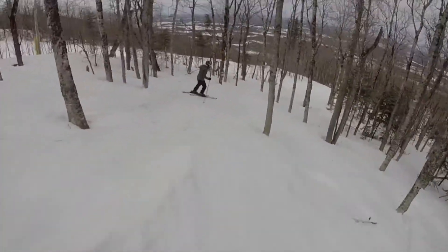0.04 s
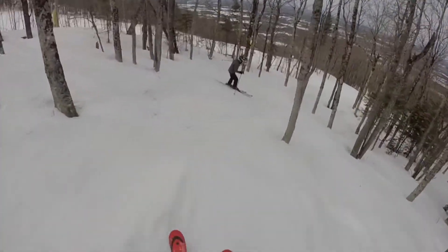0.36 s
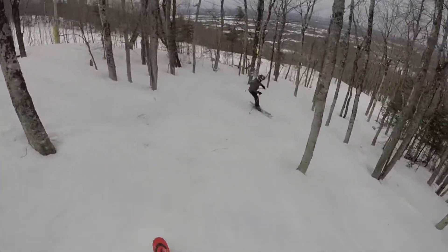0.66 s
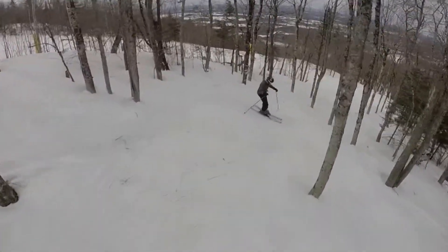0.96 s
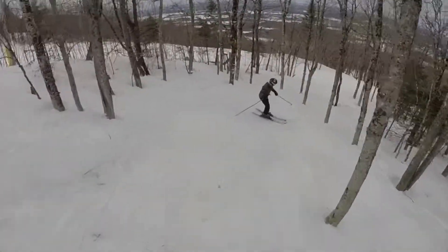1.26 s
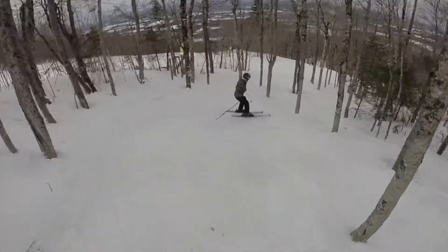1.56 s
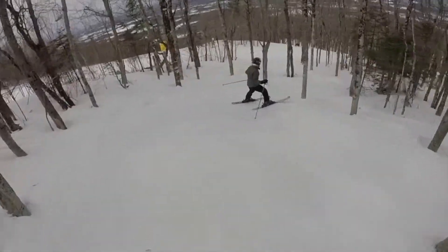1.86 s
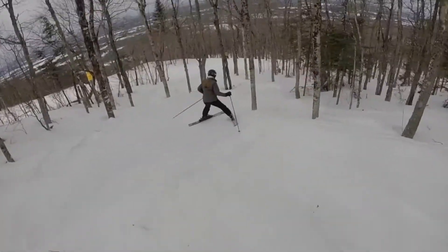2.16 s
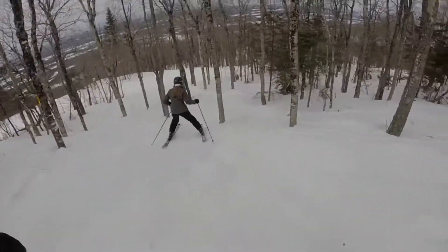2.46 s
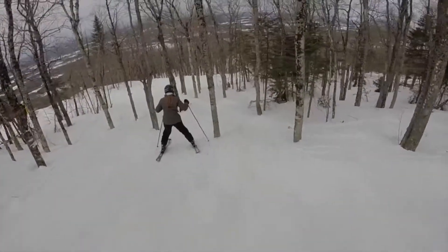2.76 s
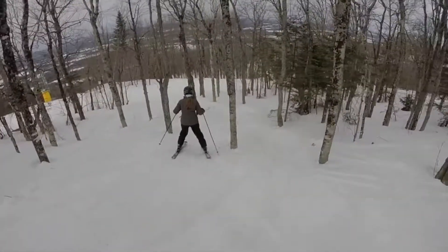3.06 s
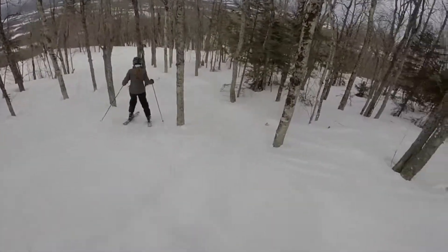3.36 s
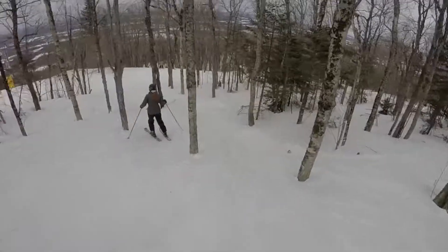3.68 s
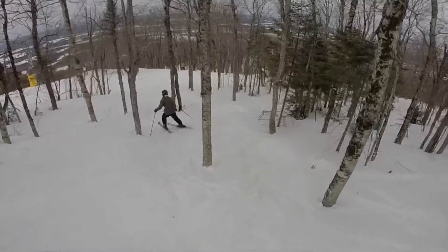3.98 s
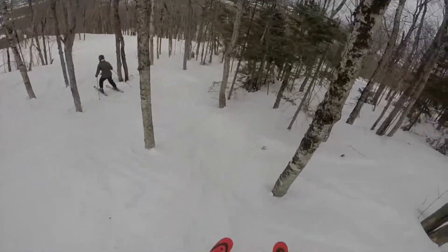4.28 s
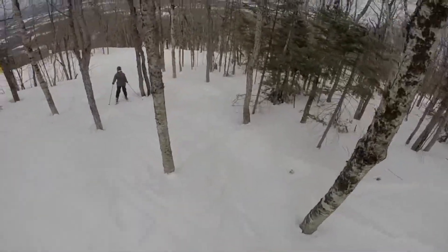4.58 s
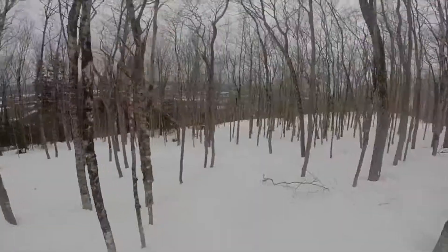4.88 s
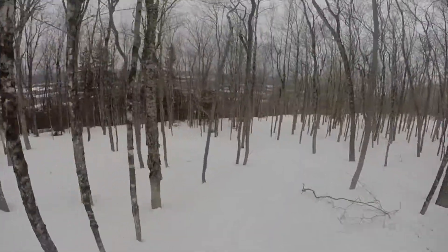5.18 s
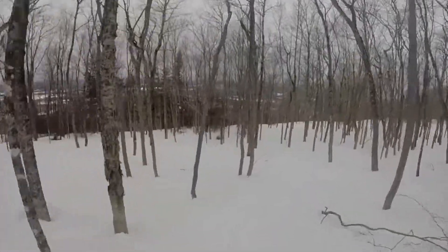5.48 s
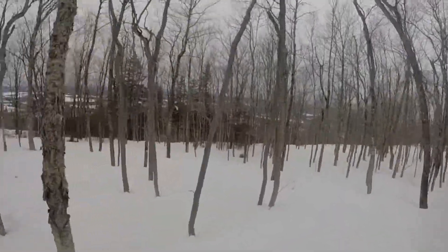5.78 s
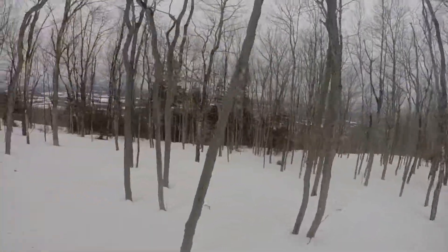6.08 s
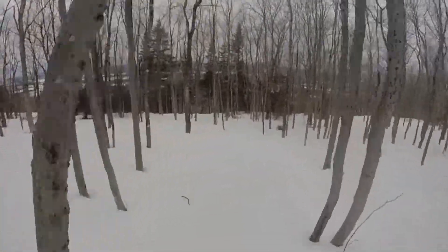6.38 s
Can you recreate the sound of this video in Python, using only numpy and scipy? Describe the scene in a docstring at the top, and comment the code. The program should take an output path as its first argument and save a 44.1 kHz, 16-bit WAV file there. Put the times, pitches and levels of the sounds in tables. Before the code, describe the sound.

Ski edges skid and spray through snow before a rattling glide on crust, while gusts of wind buffet and thump the microphone.

```python
"""Ski edges skid through soft snow in a few turns, crunching and spraying, as one skier follows another
through a wood. Then the skis run flatter over a crust that makes them ring, with one hard scrape.
Both textures are countless snapping crystals and tinking granules, louder as the edges press harder.
Clods crunch under the skis, the gear clacks twice, and air rumbles and thumps on a helmet camera."""
import sys
import numpy as np
from scipy import signal
from scipy.fft import rfft, irfft, next_fast_len
from scipy.io import wavfile
from scipy.ndimage import uniform_filter1d

SR = 44100
rng = np.random.default_rng(int(sys.argv[2]) if len(sys.argv) > 2 else 0)


def store_pcm(level_fs):
    """Save levels as 16-bit WAV."""
    pcm = np.round(np.clip(level_fs, -1, 1) * 32767).astype(np.int16)
    wavfile.write(sys.argv[1], SR, np.atleast_2d(pcm).T)


N = 284004
TIME = np.arange(N) / SR
CRUST_FROM_S = 4.85
CUTOFF_HZ = 15250

# air on the housing, rising with the speed of each turn: (time [s], buffet level [dB], throb level [dB])
WIND_LEVELS = [(0, -30.5, -25), (.85, -35, -30), (1.1, -44.5, -44), (1.6, -38, -39.5), (2.0, -42, -28),
               (2.33, -20, -23.5), (2.5, -31.5, -33), (3.2, -39.5, -43), (4.0, -39.5, -44),
               (4.4, -38.5, -32.5), (4.75, -45.5, -47.5), (4.97, -32.5, -41), (5.25, -36.5, -49),
               (5.62, -21.5, -28), (5.8, -31.5, -41), (6.12, -33, -39.5), (6.3, -27, -24.5),
               (6.44, -27.5, -34)]
# gusts that push up the throb: (time [s], boost [dB], length [s])
THROB_GUSTS = [(.4, 5.5, 0.034), (.72, 10.5, 0.026), (.81, 4, 0.045), (1.01, 10, 0.033), (1.28, 8, 0.19),
               (1.74, 11.5, 0.16), (2.13, 11.5, 0.054), (2.63, 13, 0.077), (3.77, 11.5, 0.096),
               (3.93, 10, 0.075), (4.18, 6.5, 0.088), (4.55, 8.5, 0.053), (5.96, 12, 0.054)]
# EQ of the deep buffets, the throb and the rush of air: (frequency [Hz], gain [dB])
BUFFET_EQ = [(8, -23.5), (18, -2), (34, 1), (44, 0), (60, -23), (120, -23.5), (300, -44), (1500, -69.5)]
THROB_EQ = [(20, -35), (40, -12), (50, 1), (61, 7), (74, -3), (95, -18), (125, -22), (160, -54.5),
            (300, -52.5), (600, -46), (1500, -73)]
RUSH_EQ = [(40, -5), (130, -5), (250, -3), (500, -4), (900, -6), (2000, -12), (6000, -23), (15000, -39)]
# jolts and buffets on the housing: (time [s], relative level [dB], pitch [Hz])
THUMP_CUES = [(2.227, -25, 140), (2.292, -18, 127), (2.469, -26.5, 133), (2.614, -22.5, 124),
              (2.666, -26, 106), (4.348, -24.5, 78.4), (5.675, -25.5, 124), (6.18, -1.5, 47),
              (6.267, -25.5, 122), (6.331, -14.5, 44.3)]
# sharp clacks of the gear: (time [s], relative level [dB])
CLACK_CUES = [(2.315, -7), (5.883, -23)]
# what the gear rings with: (frequency [Hz], gain [dB], 60 dB decay time [s])
GEAR_MODES = [(554, 2, 0.0023), (1350, -19, .012), (1970, -7, 0.017), (2440, -4, 0.01),
              (3130, -0.5, 0.0031), (4800, -7.5, 0.012), (6600, -11.5, 0.0032), (10400, -17.5, 0.0042)]
# the larger clods crushed under a ski: (time [s], relative level [dB])
CLOD_CUES = [(.132, -13), (.358, -16), (.469, -19), (.612, -19), (.665, -17), (.86, -26), (1.932, -17),
             (2.22, -13), (2.503, -26), (3.345, -23), (4.077, -21.5), (4.866, -30), (5.108, -34.5),
             (5.27, -26.5), (5.618, -7), (5.67, -18), (5.77, -17), (5.853, -18.5), (5.883, -17.5),
             (6.071, -19.5)]

# edge pressure in soft snow; each of three turns builds, bites and releases: (time [s], pressure [dB])
SKID_PRESSURE = [(0, -30.5), (.16, -31), (.45, -35), (.7, -35.3), (.915, -39), (.945, -44), (1.27, -44),
                 (1.65, -40), (2.06, -40), (2.34, -28), (2.54, -36), (2.85, -41), (3.24, -38.5),
                 (3.37, -35), (3.69, -34.5), (3.82, -38.5), (4.2, -43.5), (4.58, -54), (4.67, -45.5),
                 (4.86, -45)]
# edge pressure on crust; a light run, one hard scrape, a steady glide: (time [s], pressure [dB])
GLIDE_PRESSURE = [(4.85, -44), (4.98, -42), (5.11, -54), (5.27, -51), (5.41, -34.5), (5.59, -22),
                  (5.75, -35), (5.98, -45), (6.13, -39), (6.44, -37.5)]
# brief swishes as a ski pushes over a bump: (time [s], extra pressure [dB], length [s])
BUMP_SWISHES = [(.23, 4, 0.046), (.37, 2.5, 0.021), (1.92, 3, 0.073), (2.67, 2, 0.17), (2.93, 2.5, 0.075),
                (4.13, 3, .05), (4.33, 6.5, 0.13), (4.55, 5, 0.034), (5.21, 10.5, 0.027), (5.8, 7.5, 0.017),
                (5.9, 5.5, .04), (6.08, 2, 0.042)]
# packed snow trades spray for crunch, icy snow sizzles: (time [s], packing [dB], extra sizzle [dB])
SNOW_TEXTURE = [(0, -0.5, 1.5), (.6, .5, -1.5), (.9, -0.8, 1.5), (1.0, -1.5, -1), (1.9, .5, -1.5),
                (2.3, 0, 1.5), (2.5, -1.1, 2), (2.85, 1, -0.5), (3.4, 1, -0.5), (4.15, -0.6, 0),
                (4.7, -2, -0.5)]
# broad EQ of the scrape on soft snow and on crust: (frequency [Hz], gain [dB])
SKID_EQ = [(100, -26), (300, -11), (600, -7.5), (900, -6), (1400, 0.5), (2600, 2.5), (3600, -1.5),
           (5000, 1.5), (6500, -9.5), (8500, -16), (11000, -26.5), (15000, -34)]
GLIDE_EQ = [(100, -26), (300, -16), (560, -16), (900, -8), (1400, -6.5), (2600, -0.5), (3600, -10.5),
            (5000, -14.5), (6500, -17.5), (8500, -24.5), (11000, -37.5), (15000, -49)]
# resonances and hollows of skis and housing on each surface: (frequency [Hz], width [Hz], gain [dB])
SKID_BELLS = [(740, 76, 2), (989, 160, 6), (1340, 95, 5), (1507, 450, 10), (1872, 133, 7), (2150, 234, -8),
              (3006, 78, 3.5), (3517, 320, 6), (4570, 82, -14.5), (4780, 310, 3.5), (5270, 780, -5.5),
              (6170, 490, 4.5), (8530, 710, -3), (10860, 1700, 5)]
GLIDE_BELLS = [(930, 150, -6), (1130, 170, 6), (1450, 220, 5.5), (1820, 230, 9.5), (2190, 330, -12),
               (2490, 300, 13), (2940, 250, 8), (4140, 300, -4), (4800, 230, 4), (5940, 870, 4.5),
               (8860, 900, -7), (10310, 1130, 2)]
# how each layer of a ski answers the edge: (base level at the usual pressure [dB], slope [dB per dB])
SOFT_CRUNCH, SOFT_SPRAY, SOFT_SIZZLE = (-38.5, 1.22), (-38.5, 1), (-54, 1)
CRUST_CRUNCH, CRUST_RING, CRUST_SPRAY = (-40, 1.04), (-37, 0.81), (-46.5, 0.85)
USUAL_PRESSURE_DB = -35

# narrow resonances and hollows of the closed camera case: (frequency [Hz], width [Hz], gain [dB])
CASE_BELLS = [(1806, 24, 1), (1970, 87, -1.5), (2610, 60, 1.5), (3000, 62, 1.5), (3507, 52, 2),
              (3790, 90, 3), (4425, 71, 4), (5880, 91, -0.5), (5948, 80, 3.5), (6800, 220, -2),
              (7100, 150, 3), (7720, 250, -3), (7957, 89, 2.5)]
# a neutral EQ to lay them on: (frequency [Hz], gain [dB])
FLAT_EQ = [(20, 0), (20000, 0)]


def from_db(db):
    """Decibels to gain."""
    return 10 ** (np.asarray(db) / 20)


def rms_one(x):
    """Scale to unit power."""
    return x / np.sqrt(np.mean(x ** 2) + 1e-20)


def automation(rows):
    """One curve, sample by sample, for each column after the time."""
    times, *columns = np.transpose(rows)
    return [np.interp(TIME, times, column) for column in columns]


def swells(rows):
    """A bell-shaped rise in dB for each row; its length is the width at half height."""
    return sum(db * .5 ** np.minimum((2 * (TIME - s) / length) ** 2, 20) for s, db, length in rows)


def drift(rate_hz):
    """A smooth random modulator with a spread of about 1, held within +-2."""
    pole = np.exp(-2 * np.pi * rate_hz / SR)
    wander = signal.lfilter([1], [1, -2 * pole, pole * pole], rng.standard_normal(N + SR))[SR:]
    return np.clip(rms_one(wander), -2, 2)


def lagging(db, lag_s):
    """A level that trails behind its cause."""
    pole = np.exp(-1 / (lag_s * SR))
    return db[0] + signal.lfilter([1 - pole], [1, -pole], db - db[0])


def lowpass(x, hz, order):
    """Roll off the treble."""
    return signal.sosfilt(signal.butter(order, hz, fs=SR, output="sos"), x)


def crossover(x, hz):
    """The bands below and above a frequency."""
    low = signal.sosfiltfilt(signal.butter(6, hz, fs=SR, output="sos"), x)
    return low, x - low


def colour(x, eq, bells=()):
    """A broad EQ curve plus bell-shaped peaks and hollows."""
    size = next_fast_len(N + SR)
    size += size % 2
    hz = np.maximum(np.fft.rfftfreq(size, 1 / SR), 1)
    eq_hz, eq_db = np.transpose(eq)
    db = np.interp(np.log(hz), np.log(eq_hz), eq_db)
    for centre, width, height in bells:
        db += height / (1 + (2 * (hz - centre) / width) ** 2)
    cepstrum = irfft(np.log(from_db(db)))
    cepstrum[1:size // 2] *= 2      # minimum phase: nothing rings before its cause
    cepstrum[size // 2 + 1:] = 0
    return irfft(rfft(x, size) * np.exp(rfft(cepstrum)))[:N]


def ring(x, hz, t60):
    """A resonator: each click sets off a decaying sine."""
    pole, angle = from_db(-60 / (t60 * SR)), 2 * np.pi * hz / SR
    return signal.lfilter([0, np.sin(angle)], [1, -2 * pole * np.cos(angle), pole * pole], x + 1e-18)


def eddies(eq):
    """Low turbulence, levelled to an even strength."""
    swirl = colour(rng.standard_normal(N), eq)
    return swirl / np.sqrt(uniform_filter1d(swirl ** 2, size=SR // 14) + 1e-20)


def wind(flutter_db, flutter_hz, rush_db, rush_follows):
    """Large eddies buffet the housing, smaller ones throb in gusts, over a faint rush of air."""
    buffet_db, throb_db = automation(WIND_LEVELS)
    buffet = from_db(buffet_db) * eddies(BUFFET_EQ)
    throb = from_db(throb_db + swells(THROB_GUSTS) + flutter_db * drift(flutter_hz)) * eddies(THROB_EQ)
    rush_gain = from_db(rush_db + rush_follows * (throb_db - throb_db.mean()))
    rush = rush_gain * rms_one(colour(rng.standard_normal(N), RUSH_EQ))
    return buffet + throb + rush


def thumps(trim_db, swell_cycles, ring_cycles, puff_db, puff_hz, puff_s):
    """A soft push swings the housing for a cycle or two, with a dull puff of air at its height."""
    dull_air = rms_one(lowpass(rng.standard_normal(N), puff_hz, order=2))
    out = np.zeros(N)
    for s, db, hz in THUMP_CUES:
        cycles = (TIME - s) * hz
        fade = np.where(cycles < 0, (cycles / swell_cycles) ** 2, cycles / ring_cycles)
        swing = np.exp(-fade.clip(0, 50)) * np.cos(2 * np.pi * cycles)
        puff = from_db(puff_db) * dull_air / np.cosh(np.clip((TIME - s) / puff_s, -50, 50))
        out += from_db(db + trim_db) * (puff - swing)
    return out


def clacks(trim_db, snap_db):
    """A hard contact in the gear gives a short snap and rings a few quickly damped modes."""
    hits = np.zeros(N)
    for s, db in CLACK_CUES:
        hits[round(s * SR)] = from_db(db + trim_db)
    body = sum(ring(hits, hz, t60) * from_db(db) * (-1) ** k for k, (hz, db, t60) in enumerate(GEAR_MODES))
    snap = from_db(snap_db) * lowpass(hits, hz=2500, order=1)
    return body + snap


def small_clods(pressure_db, per_s=6, boost_db=8, spread_db=3.5, candidates=80):
    """Random crumbs, louder where the edge presses harder: (time [s], relative level [dB])."""
    when, chance, bulk = rng.random((candidates, 3)).T
    db = pressure_db[(when * N).astype(int)] + boost_db + spread_db * (2 * bulk - 1)
    crushed = chance < per_s * N / SR / candidates
    return list(zip(when[crushed] * N / SR, db[crushed]))


def clods(pressure_db, eq, bells, trim_db, dull_hz, attack_s=.0015, decay_s=.0048):
    """Each clod collapses under the ski in a short, dull burst of noise."""
    envelope = np.zeros(N)
    for s, db in [*CLOD_CUES, *small_clods(pressure_db)]:
        start = int(s * SR)
        age = TIME[:min(SR // 10, N - start)]
        burst = (1 - np.exp(-age / attack_s)) * np.exp(-age / decay_s)
        envelope[start:start + len(age)] += from_db(db + trim_db) * burst
    crumble = lowpass(rng.standard_normal(N), dull_hz, order=1)
    return envelope * rms_one(colour(crumble, eq, bells))


def fractures(per_s, powder_db, spread_db=2.5):
    """Snow crystals snap at random, in all sizes, over the smooth hiss of powder."""
    sizes = from_db(spread_db * np.minimum(rng.exponential(1, N), 4)) * rng.choice([-1, 1], N)
    snaps = sizes * (rng.random(N) < per_s / SR)
    powder = from_db(powder_db) * rng.standard_normal(N)
    return rms_one(rms_one(snaps) + powder)


def granules(per_s, spread_db=3, decay_s=.004, candidates=16000):
    """Icy granules each tink briefly at a pitch of their own."""
    when, pitch, bulk, chance = rng.random((candidates, 4)).T
    struck = chance < per_s * N / SR / candidates
    age = np.arange(700)      # samples
    gain = from_db(spread_db * np.minimum(-np.log(bulk[struck, None]), 3))
    hz = CUTOFF_HZ * pitch[struck, None]
    tinks = gain * np.sin(2 * np.pi * hz * age / SR) * np.exp(-age / SR / decay_s)
    positions = (when[struck, None] * N).astype(int) + age
    return rms_one(np.bincount(positions.ravel(), tinks.ravel(), N)[:N])


def edge_pressure(curve):
    """The slow load on the edges plus the brief swishes over bumps, in dB."""
    return automation(curve)[0] + swells(BUMP_SWISHES)


def layer_levels(pressure_db, *layers):
    """Base level of each layer of a ski under this pressure, in dB."""
    return [db + slope * (pressure_db - USUAL_PRESSURE_DB) for db, slope in layers]


def judder(band, grip, grip_db, own_db, own_hz):
    """A normalised band stutters as the ski grips and lets go, partly with the others, partly alone."""
    return rms_one(band) * rms_one(from_db(grip_db * grip + own_db * drift(own_hz)))


def glide(pressure_db):
    """Coarse crust rattles under the bases and keeps the skis ringing."""
    crunch_db, ring_db, spray_db = layer_levels(pressure_db, CRUST_CRUNCH, CRUST_RING, CRUST_SPRAY)
    snow = fractures(per_s=4000, powder_db=0) + from_db(-6) * granules(per_s=1800)
    crunch, highs = crossover(colour(snow, GLIDE_EQ, GLIDE_BELLS), hz=2160)
    ringing, spray = crossover(highs, hz=3490)
    grip = drift(rate_hz=49)
    crunch = from_db(crunch_db) * judder(crunch, grip, grip_db=1.0, own_db=0.6, own_hz=25)
    ringing = from_db(ring_db) * judder(ringing, grip, grip_db=2.0, own_db=2.1, own_hz=66)
    spray = from_db(spray_db) * judder(spray, grip, grip_db=1.45, own_db=2.0, own_hz=130)
    return crunch + ringing + spray


def skid(pressure_db):
    """Tilted edges shave soft snow: crunch at the bottom, spray above it, a fine sizzle on top."""
    crunch_db, spray_db, sizzle_db = layer_levels(pressure_db, SOFT_CRUNCH, SOFT_SPRAY, SOFT_SIZZLE)
    sizzle_db = lagging(sizzle_db, lag_s=0.024)      # the finest ice hangs in the air behind the edge
    packing_db, icy_db = automation(SNOW_TEXTURE)
    snow = fractures(per_s=8000, powder_db=1) + from_db(-6) * granules(per_s=2200)
    crunch, highs = crossover(colour(snow, SKID_EQ, SKID_BELLS), hz=1776)
    spray, sizzle = crossover(highs, hz=6760)
    grip = drift(rate_hz=70)
    crunch = from_db(crunch_db + packing_db) * judder(crunch, grip, grip_db=1.0, own_db=1.07, own_hz=37)
    spray = from_db(spray_db - packing_db) * judder(spray, grip, grip_db=1.32, own_db=1.0, own_hz=18)
    sizzle = from_db(sizzle_db + icy_db) * judder(sizzle, grip, grip_db=1.4, own_db=0.1, own_hz=29)
    return crunch + spray + sizzle


def scene():
    """Soft snow gives way to crust in a quick equal-power crossfade, over a bed of wind."""
    soft_db, crust_db = edge_pressure(SKID_PRESSURE), edge_pressure(GLIDE_PRESSURE)
    soft = skid(soft_db) + clods(soft_db, SKID_EQ, SKID_BELLS, trim_db=-6.5, dull_hz=3000)
    crust = glide(crust_db) + clods(crust_db, GLIDE_EQ, GLIDE_BELLS, trim_db=-4.5, dull_hz=6000)
    on_crust = np.clip((TIME - CRUST_FROM_S) / 0.017 + .5, 0, 1)
    skis = np.sqrt(1 - on_crust) * soft + np.sqrt(on_crust) * crust
    gear = clacks(trim_db=-2.0, snap_db=6)
    air = wind(flutter_db=3.0, flutter_hz=13.5, rush_db=-58.5, rush_follows=0.075)
    jolts = thumps(trim_db=2, swell_cycles=.39, ring_cycles=.95, puff_db=-24.5, puff_hz=205, puff_s=.0053)
    return (skis + gear + air + jolts)[None]


def record(dry):
    """The case colours the sound, the highest peaks are soft-clipped and the top is cut steeply."""
    boxed = colour(dry[0], FLAT_EQ, CASE_BELLS)[None]
    rounded = boxed / (1 + (boxed / .98) ** 8) ** (1 / 8)
    return signal.sosfilt(signal.ellip(12, .1, 90, CUTOFF_HZ, fs=SR, output="sos"), rounded)


dry = scene()
out = record(dry)
store_pcm(out)
```